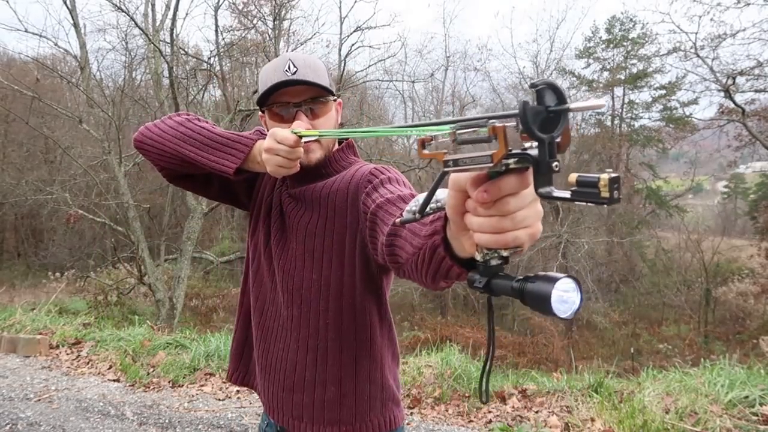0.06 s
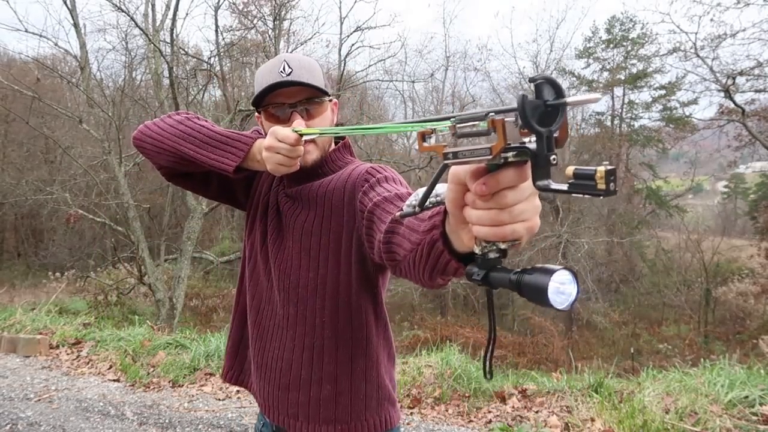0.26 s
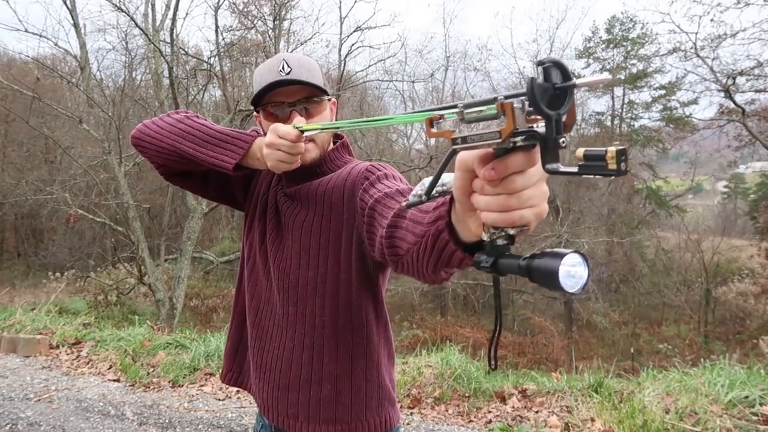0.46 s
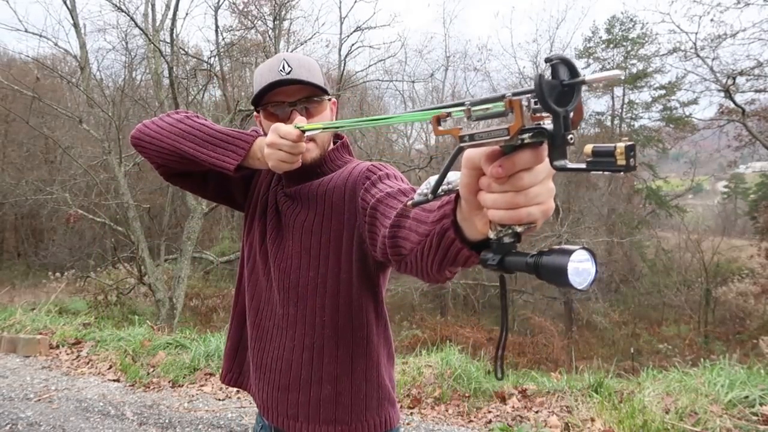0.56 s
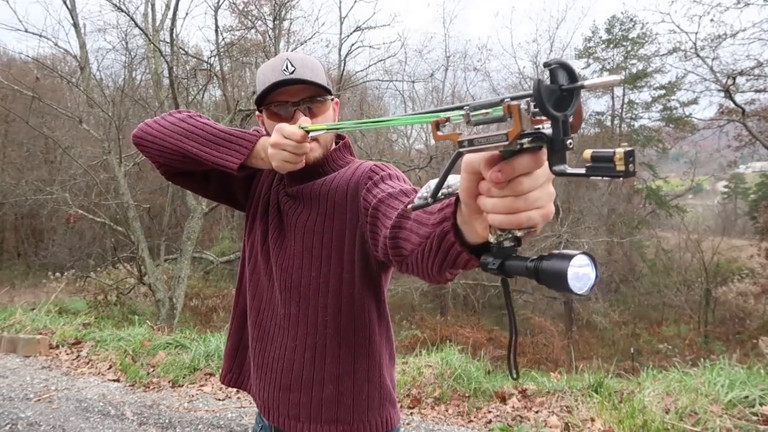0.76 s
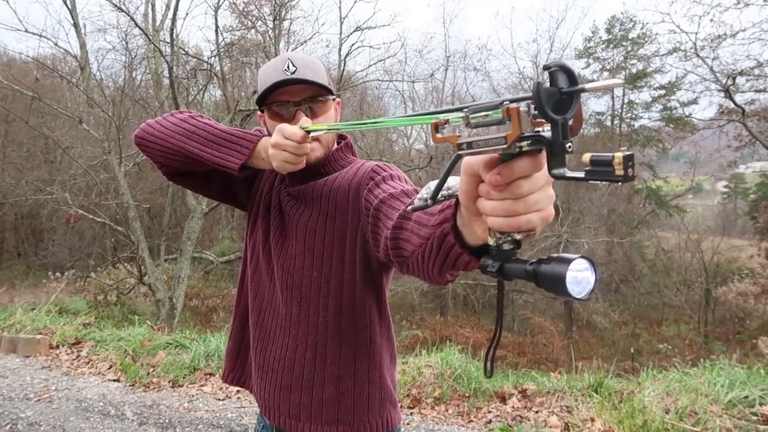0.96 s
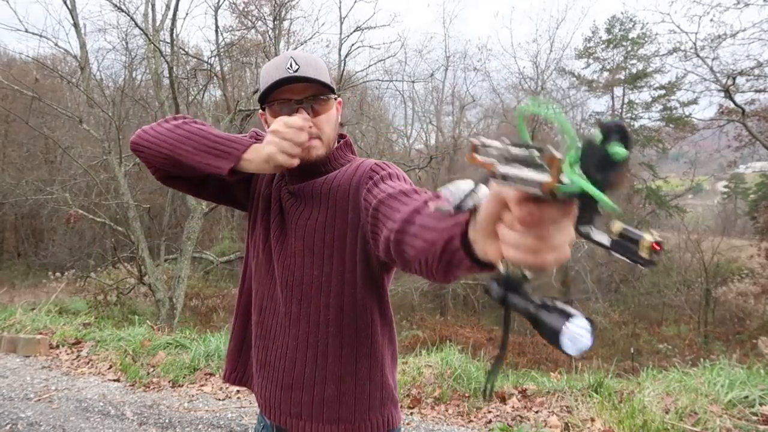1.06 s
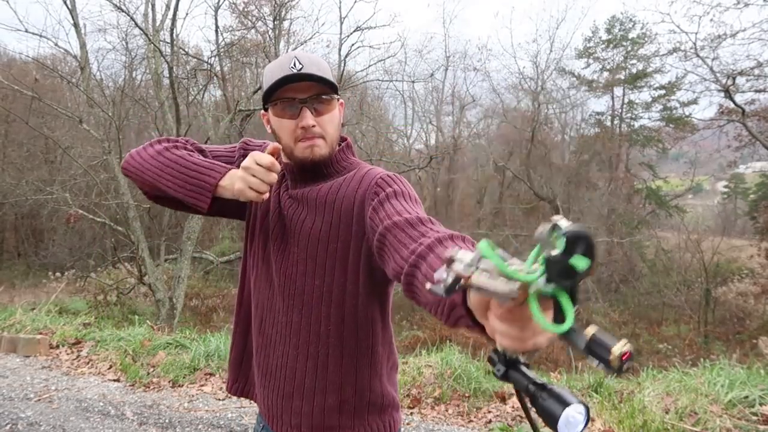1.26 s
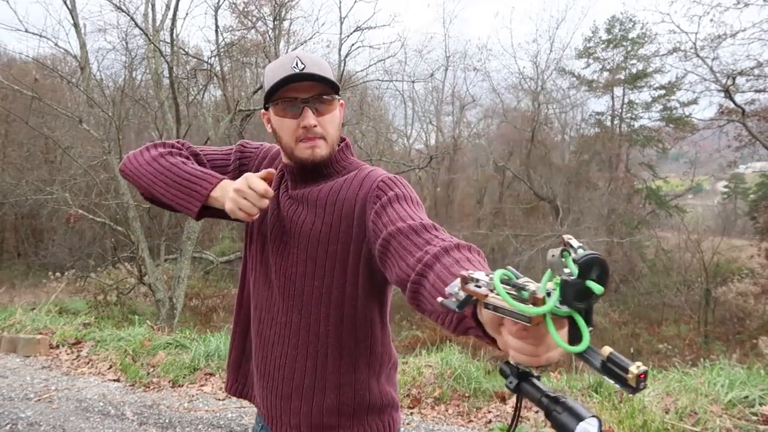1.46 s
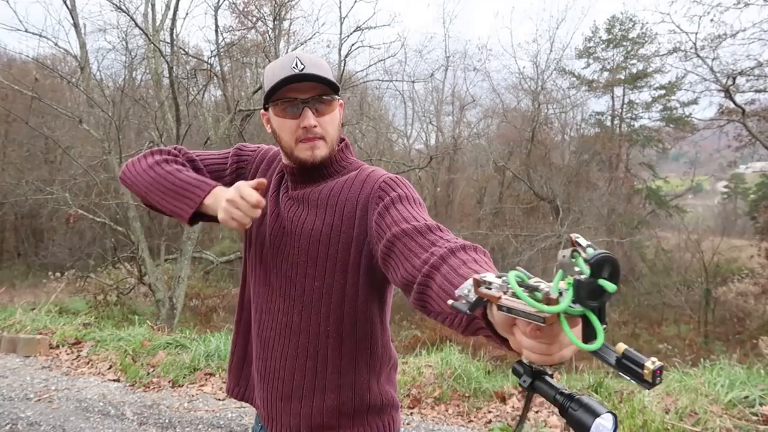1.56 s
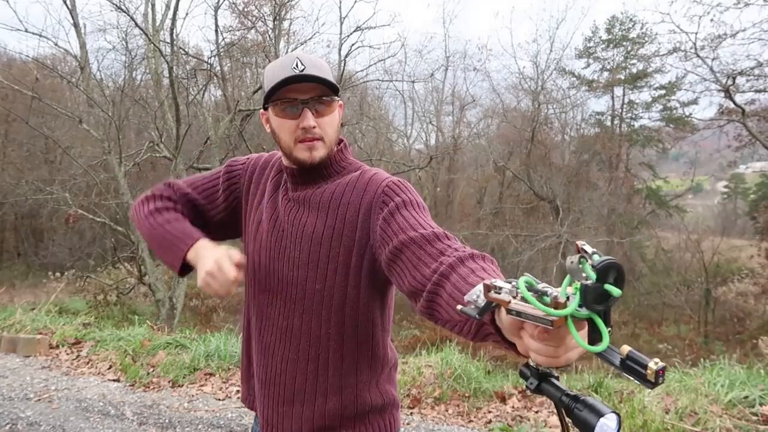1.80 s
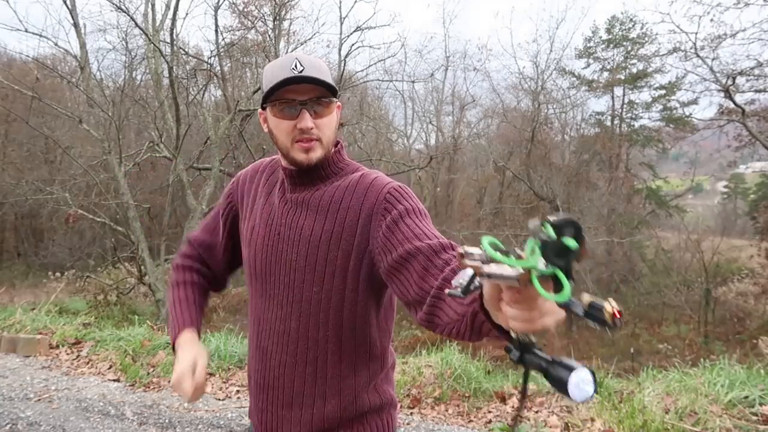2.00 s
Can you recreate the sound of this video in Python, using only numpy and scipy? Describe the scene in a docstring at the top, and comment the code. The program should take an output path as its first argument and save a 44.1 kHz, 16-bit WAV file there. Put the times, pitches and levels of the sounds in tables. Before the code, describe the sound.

A slingshot snaps loudly up close, its bands flapping, then its arrow thuds into a target

```python
"""Slingshot arrow beside a wood

Distant traffic rushes as coloured noise, with a wavering engine drone and a thin steady whine on top.
Gear ticks; the arrow scrapes over its rest, the bands slap the frame and flap about, a sleeve rustles.
The arrow thuds into a target: struck modes and a crack, one clear echo and noise returned by the trees.
The slap overloads the camera, whose gain control ducks everything after it and recovers slowly."""
import sys
import numpy as np
from scipy import signal
from scipy.fft import rfft, irfft
from scipy.io import wavfile
from scipy.ndimage import uniform_filter1d

SR = 44100
rng = np.random.default_rng(int(sys.argv[2]) if len(sys.argv) > 2 else 0)


def bounce(signal):
    """Save signal as a 16-bit WAV file at the path given by the first command-line argument."""
    frames = np.transpose(np.atleast_2d(signal))
    limited = np.clip(frames, -1, 1)
    pcm = np.round(limited * 32767).astype(np.int16)
    wavfile.write(sys.argv[1], SR, pcm)


N = 89831  # samples, about 2 s


def undb(db):
    """Decibels to gain."""
    return 10 ** (np.asarray(db) / 20)


def seconds():
    """Time of each sample."""
    return np.arange(N) / SR


def noise(points):
    """Noise of unit level, coloured by (frequency [Hz], relative level [dB]) points."""
    hz, db = np.array(points, float).T
    f = np.maximum(np.fft.rfftfreq(N, 1 / SR), 1)
    colour = undb(np.interp(np.log(f), np.log(hz), db))
    bass_fall = np.minimum(f / hz[0], 1) ** 2  # below the first point
    x = irfft(rfft(rng.standard_normal(N)) * colour * bass_fall, N)
    return x / x.std()


def wide(points):
    """Coloured noise that differs a little between left and right."""
    side_db = -17.5
    return noise(points) + undb(side_db) * noise(points) * np.array([[1], [-1]])


def walk(rate):
    """Smooth random wander of unit spread, heading for a new value `rate` times a second."""
    hold = max(int(SR / rate), 1)
    steps = rng.standard_normal(N)[np.arange(N) // hold]
    x = uniform_filter1d(steps, hold)
    return x / x.std()


def burst(start, decay, attack=0.00058):
    """Envelope with a quick rise and an exponential fall; all times in seconds."""
    age = np.maximum(seconds() - start, 0)
    return (1 - np.exp(-age / attack)) * np.exp(-age / decay)


def bursts(rows):
    """Summed envelopes of (time [s], level [dB], decay [s]) rows."""
    return sum(undb(db) * burst(start, decay) for start, db, decay in rows)


def ring(modes, start):
    """Damped modes (frequency [Hz], level [dB], T60 [s]) struck at one moment."""
    age = np.maximum(seconds() - start, 0)
    onset = np.minimum(age * SR / 2, 1)  # two-sample rise
    total = 0
    for hz, db, t60 in modes:
        fall = np.exp(-np.minimum(np.log(1000) * age / t60, 100))
        total = total + undb(db) * np.cos(2 * np.pi * hz * age) * fall
    return onset * total


def delay(x, lag):
    """Delay by a time in seconds, as a phase slope over frequency."""
    return irfft(rfft(x) * np.exp(-2j * np.pi * np.fft.rfftfreq(N, 1 / SR) * lag), N)


def cut(x, hz, kind):
    """Second-order high-pass or low-pass."""
    return signal.sosfilt(signal.butter(2, min(hz, SR / 2 - 1), kind, fs=SR, output="sos"), x)


def ports(x, pan_db):
    """Two microphone ports that agree in the bass and drift out of phase in the treble."""
    # phase of the left port against the right: (frequency [Hz], phase [rad])
    port_phase = [(0, 0), (1000, -.08), (2000, -.25), (3500, -.4), (4500, -1.2), (5600, -1.7), (8000, -2.4),
                  (15000, -1.9)]
    turn = np.interp(np.fft.rfftfreq(N, 1 / SR), *np.array(port_phase).T)
    left = irfft(rfft(x[0]) * np.exp(1j * turn), N)
    return np.array([left * undb(pan_db / 2), x[1] * undb(-pan_db / 2)])


def traffic():
    """Rush of distant traffic with fading tyre hiss: mid and side noise, wider in the treble."""
    # colour of the rush: (frequency [Hz], relative level [dB])
    rush_colour = [(15, -49.5), (25, -18), (49, -4.5), (121, -4), (174, -10.5), (225, -8.5), (291, -12.5),
                   (340, -10), (513, -15.5), (631, -14), (861, -17), (1440, -24.5), (2020, -26),
                   (2420, -30), (4610, -41.5), (10300, -55.5), (12000, -59), (15600, -96), (22000, -120)]
    # colour of the tyre hiss: (frequency [Hz], relative level [dB])
    hiss_colour = [(100, -18), (800, 16), (2200, -2), (4500, -14), (9000, -26), (15000, -51)]
    # stereo width: (frequency [Hz], side against mid [dB])
    side_points = [(60, -46.5), (110, -39), (200, -23.5), (380, -15.5), (700, -18), (1290, -13),
                   (2380, -8.5), (4390, -0.5), (8100, 3.5), (15000, 2.5)]
    rush_db, hiss_db, hiss_fade_s = -37.5, -50, 0.26

    def layer():
        rush = undb(rush_db + 0.4 * walk(8.57)) * noise(rush_colour)
        return rush + undb(hiss_db) * np.exp(-seconds() / hiss_fade_s) * noise(hiss_colour)

    mid, side = layer(), layer()
    hz, db = np.array(side_points, float).T
    width = undb(np.interp(np.log(np.fft.rfftfreq(N, 1 / SR) + 1), np.log(hz), db))
    stereo = mid + irfft(rfft(side) * width, N) * np.array([[1], [-1]])
    return cut(stereo, hz=11900, kind="low")


def drone():
    """Distant engine: one sine whose pitch and level waver at random."""
    # swells of the engine: (time [s], level [dB])
    engine_level = [(0, -49.5), (.5, -48), (.7, -35.5), (1.1, -46), (1.3, -52), (1.65, -61), (2.03, -46)]
    centre_hz, pitch_wander = 119, 0.018  # wander as a fraction of the pitch
    level_db = np.interp(seconds(), *np.array(engine_level).T) + 2 * walk(13)
    hz = centre_hz * (1 + pitch_wander * walk(10))
    return undb(level_db) * np.sin(2 * np.pi * np.cumsum(hz) / SR)


def whine():
    """Faint, steady, very high sine."""
    whine_hz, level_db = 13000, -78.5
    return undb(level_db) * np.sin(2 * np.pi * whine_hz * seconds())


def ticks():
    """Small ticks of the gear: tiny bursts of mid-bright noise."""
    # (time [s], level [dB], decay [s])
    tick_times = [(.2237, -29, 0.0012), (.2270, -30, 0.0015), (.230, -42.5, 0.012), (.2452, -43, 0.005),
                  (1.470, -46, .003)]
    # colour of a tick: (frequency [Hz], relative level [dB])
    tick_colour = [(500, -24), (1800, -6), (2250, 7), (2900, -0.5), (3500, -10), (4500, -4), (5500, -17.5),
                   (6600, -10), (8500, -22), (14000, -32)]
    return bursts(tick_times) * wide(tick_colour)


def scrape():
    """The arrow jolts its rest, which rings, and rubs over it as rough noise while the bands contract."""
    # colour of the rubbing: (frequency [Hz], relative level [dB])
    rub_colour = [(60, -11.5), (250, -0.5), (900, -1), (1800, -4), (2900, 1), (4500, -9.5), (8000, -12),
                  (15000, -22)]
    # the arrow's rest ringing at release: (frequency [Hz], level [dB], T60 [s])
    rest_modes = [(3150, -25.5, .022), (2600, -27.5, .04)]
    release_s, length_s, attack_s = 1.1005, 0.029, 0.0019
    rub_db, roughness = -25.5, 0.26
    swell_db, swell_s = -9, 0.0024
    time_left = release_s + length_s - seconds()
    gate = burst(release_s, 0.92, attack=attack_s) * np.clip(time_left / 0.002, 0, 1)
    swell = undb(swell_db) * np.exp(-np.abs(time_left) / swell_s)  # grows sharply towards the end
    level = (undb(rub_db) + swell) * gate * np.exp(roughness * walk(700))
    return level * wide(rub_colour) + ring(rest_modes, release_s)


def slap():
    """The bands hit the frame in quick succession: cracks, ringing modes and a short wash of noise."""
    # frame and bands: (frequency at pitch ratio 1 [Hz], relative level [dB], T60 [s])
    frame_modes = [(310, -10.5, 0.055), (616, -13.5, 0.038), (1310, -4, 0.028), (1955, -2.2, 0.017),
                   (2070, 0.5, 0.014), (2310, -1, 0.032), (2560, -13.5, .025), (2893, -9.5, 0.023),
                   (3300, -14, 0.02), (3830, -8, 0.023), (4220, -14.5, 0.04), (4846, -3, 0.022),
                   (5950, -7, 0.039), (7461, -31, 0.035)]
    # blows on the frame: (time [s], relative level [dB], pitch ratio [1])
    blows = [(1.1229, -6, 0.97), (1.1249, -4, 1.06), (1.1259, 3, 1.056), (1.12703, 2.5, 1.005),
             (1.1281, 7.5, .983), (1.1335, -8.5, .986)]
    # colour of rubber smacking: (frequency [Hz], relative level [dB])
    smack_colour = [(60, -26), (150, -15.5), (300, -4), (500, -12.5), (760, -4), (1200, -6.5), (1600, -14),
                    (2000, 0), (2300, 1), (2900, -2.5), (4000, -8.5), (6500, -12), (10000, -22.5),
                    (15000, -34)]
    # colour of the wash: (frequency [Hz], relative level [dB])
    wash_colour = [(100, -13), (1000, -5.5), (2800, -7), (4500, -7.5), (7000, -14), (10500, -26),
                   (13000, -24), (15500, -23.5)]
    ring_db, crack_db, crack_s = -7.5, -6, 0.0016
    wash_start_s, wash_db, wash_s = 1.1266, -13, 0.014
    frame, cracks = 0, 0
    for start, db, pitch in blows:
        shifted = [(hz * pitch, level, t60) for hz, level, t60 in frame_modes]
        frame = frame + undb(db) * ring(shifted, start)
        cracks = cracks + undb(db) * burst(start, crack_s)
    frame = cut(frame, hz=6485, kind="low")
    wash = undb(wash_db) * burst(wash_start_s, wash_s) * wide(wash_colour)
    return undb(ring_db) * frame + undb(crack_db) * cracks * wide(smack_colour) + wash


def bands():
    """The slack bands flutter and flap: noise smacks, each with a damped knock at its own pitch."""
    # (time [s], level of the smack [dB], decay of the smack [s], pitch of the knock [Hz])
    flaps = [(1.1700, -22, .0015, 3600), (1.1826, -18.5, 0.0028, 2430), (1.1903, -22, 0.0018, 3000),
             (1.1930, -21.5, .004, 2400), (1.1984, -21, .0015, 3100), (1.2001, -18.5, .003, 2600),
             (1.2030, -23, 0.0043, 1300), (1.2108, -21, 0.0032, 2400), (1.2212, -29, 0.0014, 3590),
             (1.2290, -19, .001, 3000), (1.2374, -25, 0.00094, 2500), (1.2436, -22.5, 0.00088, 2180),
             (1.25, -22.5, 0.0015, 1720), (1.2585, -26, 0.0035, 2900), (1.2640, -26, 0.0016, 2240),
             (1.2710, -33, 0.0016, 2100), (1.2765, -27, .0015, 3000), (1.2799, -27, .0012, 2500),
             (1.2839, -25, 0.0012, 3130), (1.2885, -35, .002, 2600), (1.3022, -31, 0.0029, 3360),
             (1.3282, -33, .0012, 3800), (1.3410, -33, 0.0039, 2640)]
    # colour of flaps and flutter: (frequency [Hz], relative level [dB])
    flap_colour = [(100, -22.5), (700, -14), (1400, -6), (2200, -2), (3300, -5), (4800, -9.5),
                   (6500, -19.5), (8500, -20), (10500, -33), (13000, -21.5), (15500, -37.5)]
    flutter_s, flutter_db, flutter_decay_s, roughness = 1.145, -29.5, 0.1, 0.55
    still_s, settle_s = 1.382, 0.06
    knock_db, knock_t60_s = 1.5, 0.013  # knock level against the smack
    flutter = undb(flutter_db) * burst(flutter_s, flutter_decay_s) * np.exp(roughness * walk(370))
    moving = np.clip((still_s - seconds()) / settle_s, 0, 1)  # the flutter dies out
    smacks = bursts([row[:3] for row in flaps])
    knocks = sum(ring([(hz, db + knock_db, knock_t60_s)], start) for start, db, _, hz in flaps)
    # the two envelopes add as powers
    return np.hypot(smacks, moving * flutter) * wide(flap_colour) + cut(knocks, hz=5000, kind="low")


def sleeve():
    """A faint rustle as the arm sinks: uneven noise under a bell-shaped swell."""
    # colour of the cloth: (frequency [Hz], relative level [dB])
    cloth_colour = [(500, -12), (2000, -3.5), (4200, -1.5), (6000, -10), (9000, -16), (14000, -24)]
    centre_s, width_s, level_db = 1.45, 0.13, -57
    swell = np.exp(-((seconds() - centre_s) / width_s) ** 2 + 0.3 * walk(90))
    return undb(level_db) * swell * wide(cloth_colour)


def target(hit_s=1.5431):
    """A short push sets the target's modes thudding while the point cracks in; ground and wood answer."""
    # resonances of the target: (frequency [Hz], relative level [dB], T60 [s])
    target_modes = [(228, -3.5, 0.0095), (630, 3, 0.007), (1160, -1, 0.0055), (1646, -7, 0.011),
                    (2430, 0, .007)]
    # the target hums on briefly: (frequency [Hz], level [dB], T60 [s])
    hum_modes = [(688, -28, 0.17)]
    # crack of the point going in: (frequency [Hz], relative level [dB])
    split_colour = [(700, -16), (1500, 0.5), (2400, -2), (3100, -4), (3900, -11), (5600, -33),
                    (8000, -36.5), (9500, -71)]
    contact_s, thud_db, low_hz, crack_db = 0.0004, 12, 155, -5
    ground_lag_s, ground_db = 0.000995, -1.5
    push = np.exp(-((seconds() - contact_s) / (contact_s / 2)) ** 2)
    struck = signal.fftconvolve(ring(target_modes, hit_s), push / push.sum())[:N]
    thud = undb(thud_db) * cut(struck, low_hz, "high")
    ground = undb(ground_db) * delay(thud, ground_lag_s)  # mirror image of the thud
    crack = undb(crack_db) * burst(hit_s + contact_s, 0.0016) * noise(split_colour)
    hum = ring(hum_modes, hit_s)
    return thud + ground + crack + hum + clear_echo(thud, crack, hit_s) + trees(hit_s)


def clear_echo(thud, crack, hit_s):
    """One booming echo: thud and crack return late and dull, with an added bass mode."""
    # bass that comes back with it: (frequency [Hz], level [dB], T60 [s])
    boom_modes = [(175, -20, 0.031)]
    lag_s, thud_db, crack_db, top_hz = 0.0668, -26.5, -11, 3000
    returned = undb(thud_db) * thud + undb(crack_db) * crack + ring(boom_modes, hit_s)
    return delay(cut(returned, hz=top_hz, kind="low"), lag_s)


def trees(hit_s):
    """The trees scatter the hit: separate noise returns over a rough, decaying haze."""
    # scattered returns: (time [s], level [dB], decay [s])
    returns = [(1.5514, -10.5, 0.0018), (1.5562, -18.5, .0025), (1.5625, -19.5, .004), (1.5660, -22, .003),
               (1.5700, -25.5, .004), (1.6090, -25, .002), (1.6148, -26, 0.0035), (1.622, -32, 0.0046),
               (1.629, -30, 0.0048), (1.647, -34, .003), (1.657, -32.5, 0.0095), (1.664, -36.5, 0.0045),
               (1.695, -35, .008), (1.768, -33.5, .004)]
    # colour of the wood: (frequency [Hz], relative level [dB])
    wood_colour = [(60, -22), (180, -9.5), (400, -2), (700, 2), (1500, -6.5), (2700, -7), (4200, -30),
                   (7000, -45), (9000, -65), (15000, -73)]
    haze_db, decay_s, roughness = -37, 0.14, 0.55
    haze = undb(haze_db) * burst(hit_s, decay_s, attack=0.018) * np.exp(roughness * walk(450))
    return np.hypot(bursts(returns), haze) * wide(wood_colour)


def scene():
    """Slingshot close by, target farther off, the outdoors and the whine."""
    near_pan_db, far_pan_db = -1.36, -1.5  # left against right
    outdoors = traffic() + drone() + whine()
    near = ticks() + scrape() + slap() + bands() + sleeve()
    return outdoors + ports(near, near_pan_db) + ports(target(), far_pan_db)


def record(dry):
    """One gain control shared by both channels ducks loud peaks; then soft clipping and a steep low-pass."""
    threshold_db, range_db = 0.5, 9.5
    attack_s, release_db_per_s, top_hz = 0.002, 1.9, 15800
    peak_db = 20 * np.log10(np.abs(dry).max(0) + 1e-9)  # the louder channel at each sample
    over_db = np.clip(peak_db - threshold_db, 0, range_db)
    recovery = release_db_per_s * seconds()
    held_db = np.maximum.accumulate(over_db + recovery) - recovery  # peak hold that slides back
    pole = np.exp(-1 / (attack_s * SR))
    duck_db = signal.lfilter([1 - pole], [1, -pole], held_db)
    x = dry * undb(-duck_db)
    x = x / (1 + x ** 6) ** (1 / 6)  # soft clip
    return signal.sosfilt(signal.ellip(8, 0.2, 70, top_hz, fs=SR, output="sos"), x)


dry = scene()
out = record(dry)
bounce(out)
```